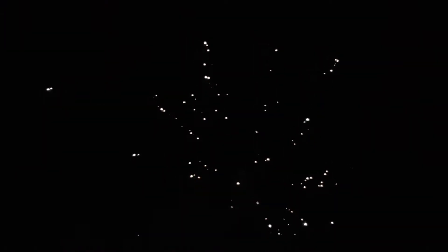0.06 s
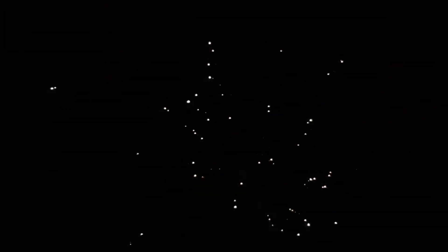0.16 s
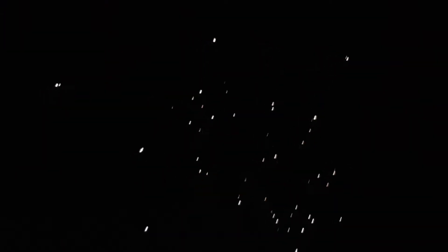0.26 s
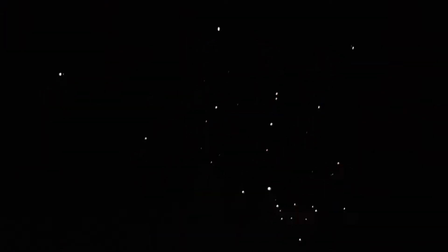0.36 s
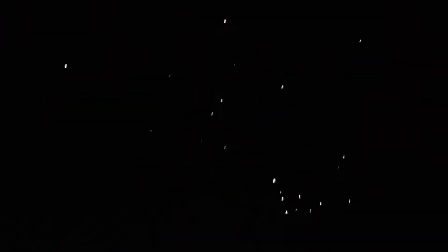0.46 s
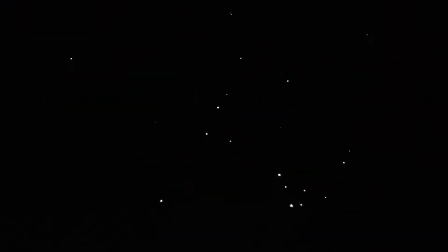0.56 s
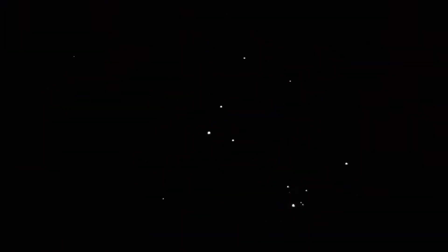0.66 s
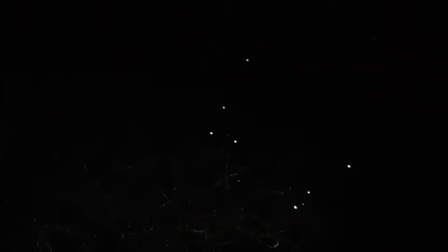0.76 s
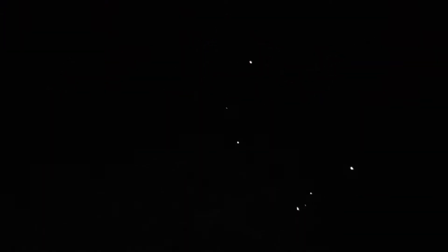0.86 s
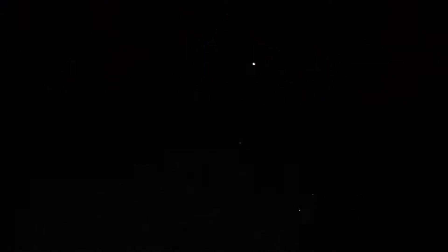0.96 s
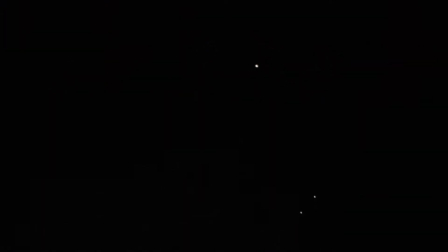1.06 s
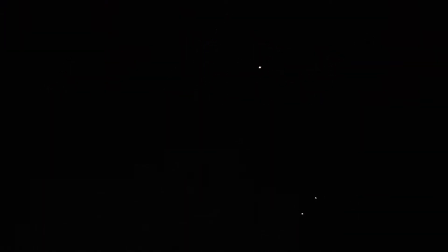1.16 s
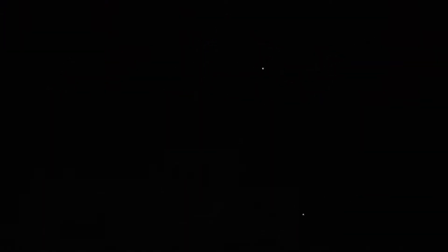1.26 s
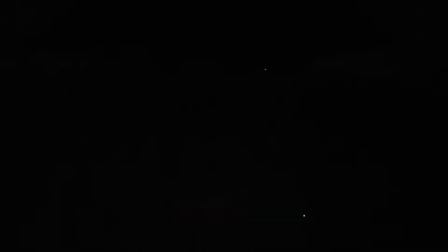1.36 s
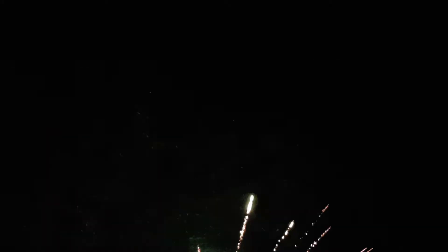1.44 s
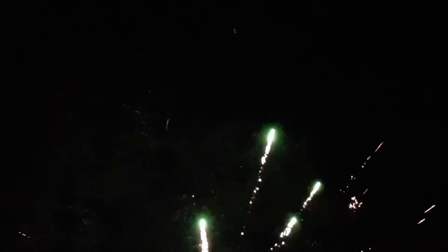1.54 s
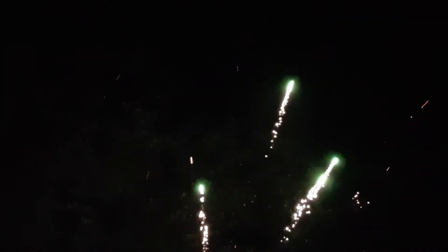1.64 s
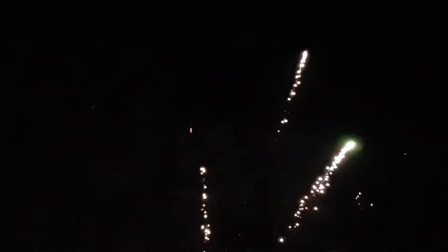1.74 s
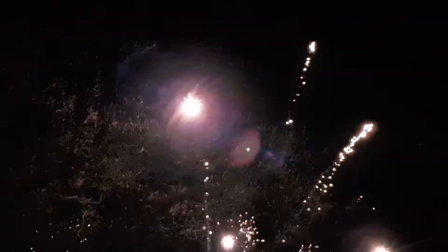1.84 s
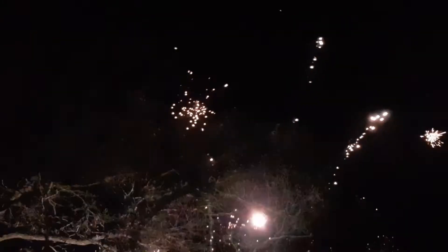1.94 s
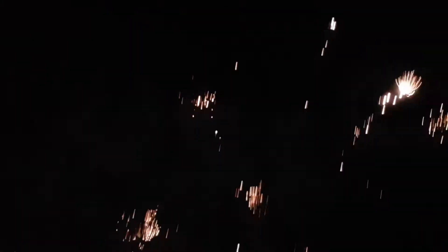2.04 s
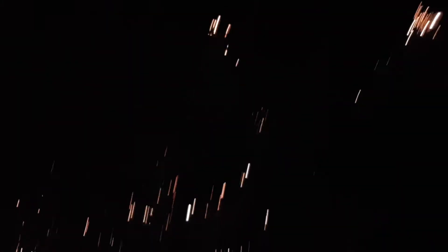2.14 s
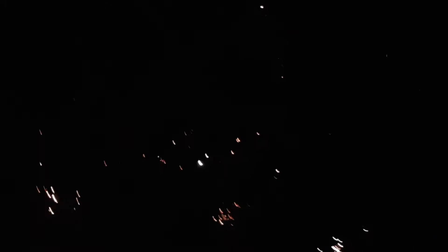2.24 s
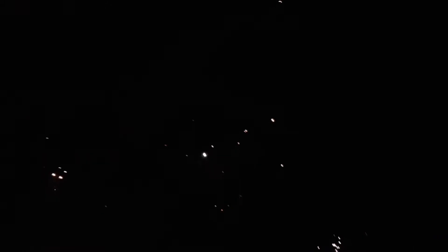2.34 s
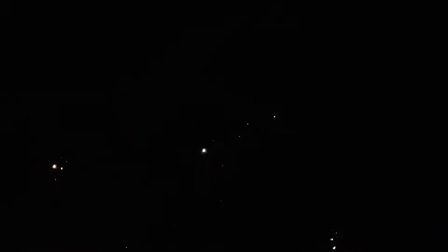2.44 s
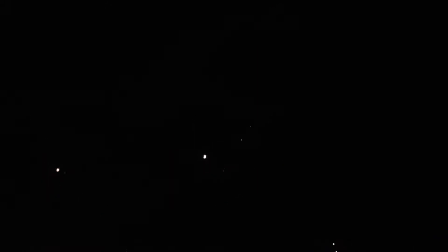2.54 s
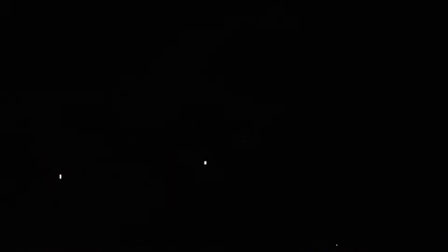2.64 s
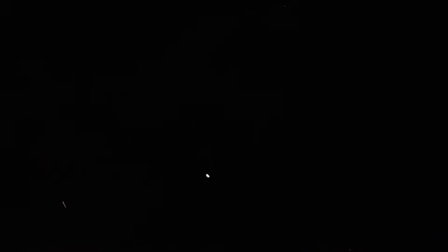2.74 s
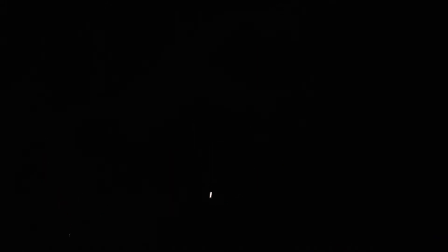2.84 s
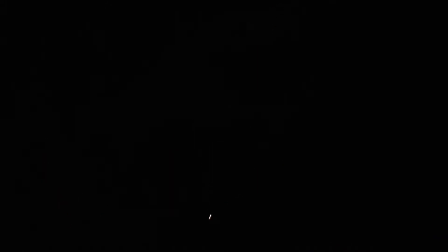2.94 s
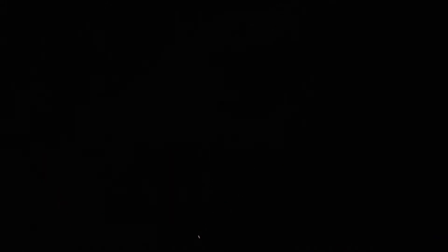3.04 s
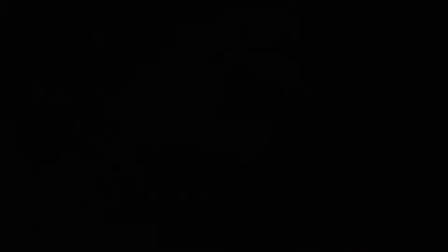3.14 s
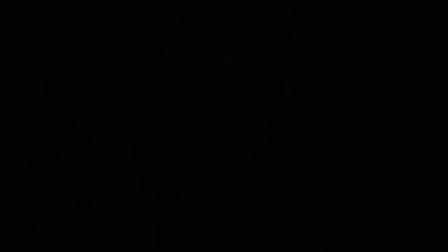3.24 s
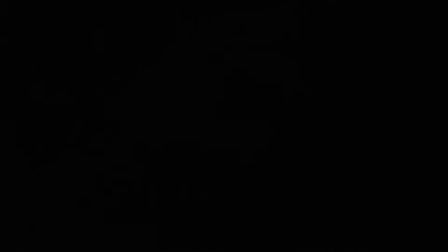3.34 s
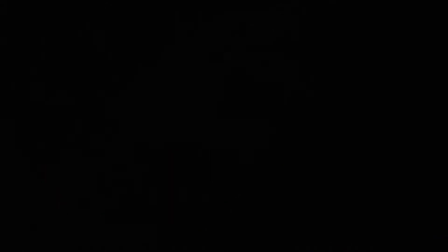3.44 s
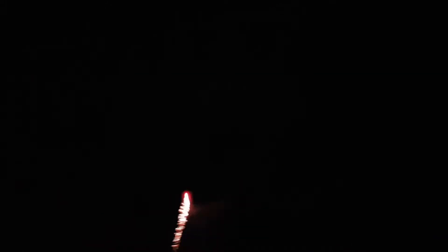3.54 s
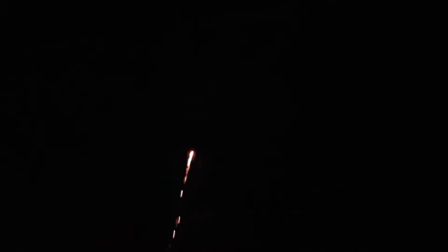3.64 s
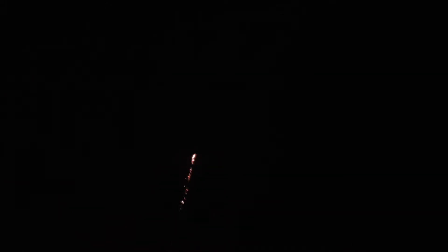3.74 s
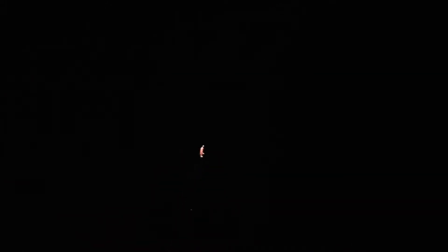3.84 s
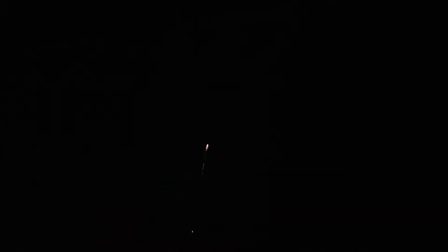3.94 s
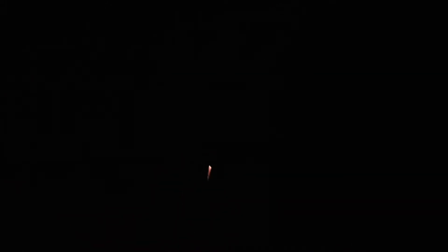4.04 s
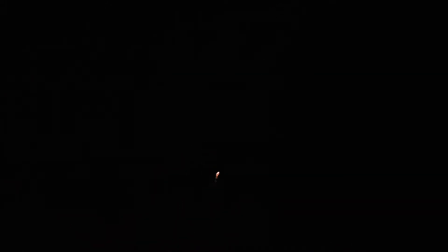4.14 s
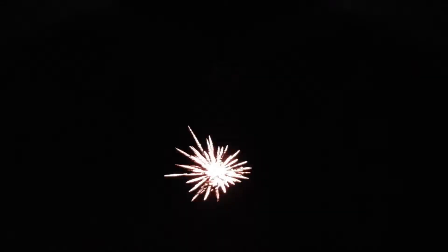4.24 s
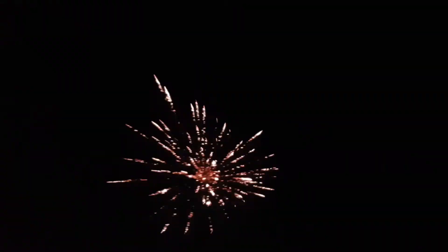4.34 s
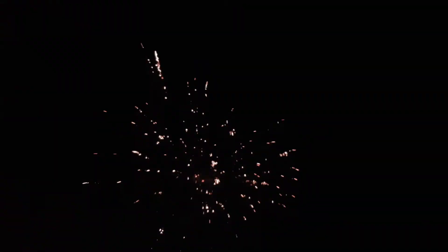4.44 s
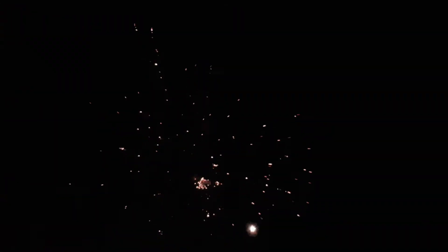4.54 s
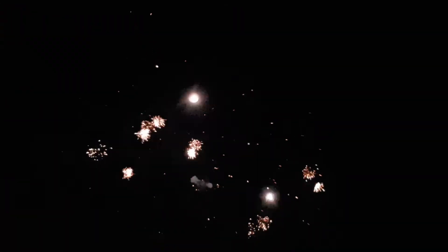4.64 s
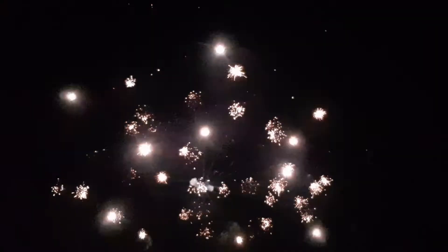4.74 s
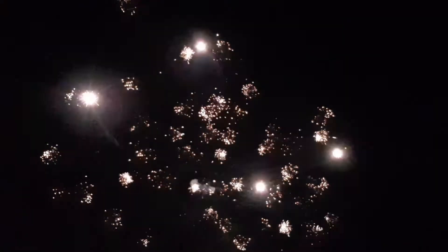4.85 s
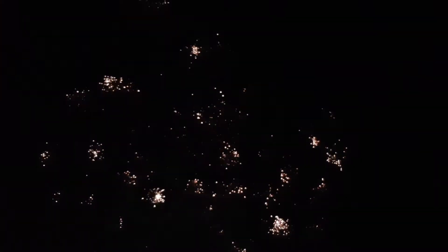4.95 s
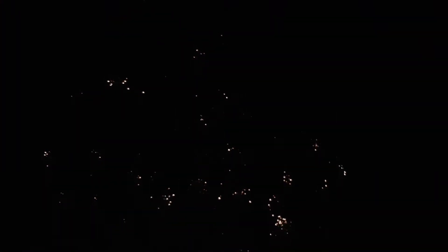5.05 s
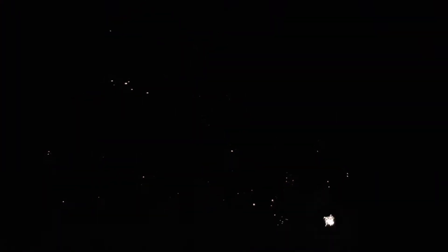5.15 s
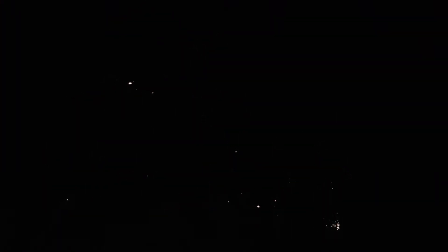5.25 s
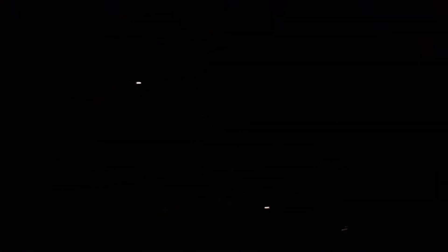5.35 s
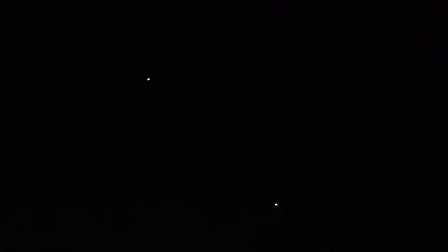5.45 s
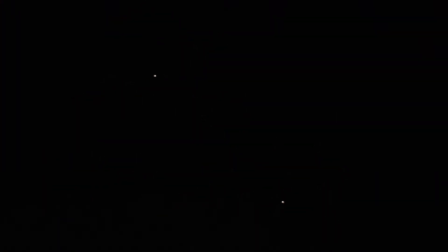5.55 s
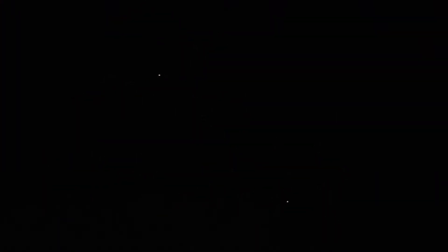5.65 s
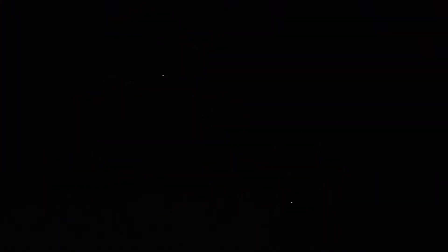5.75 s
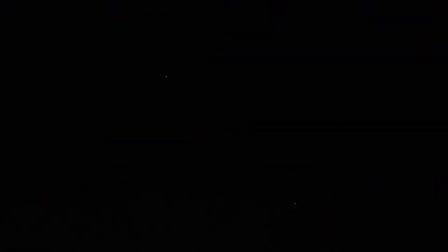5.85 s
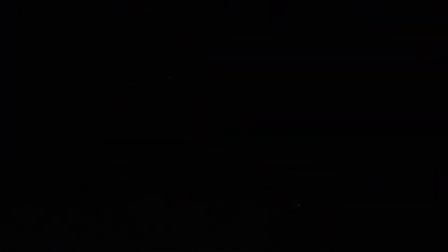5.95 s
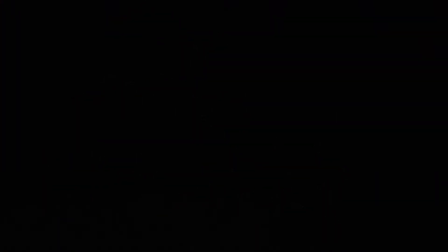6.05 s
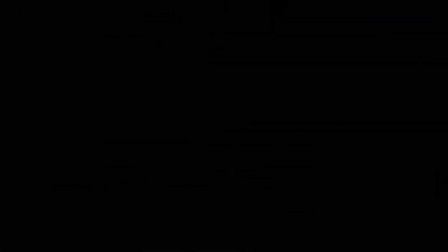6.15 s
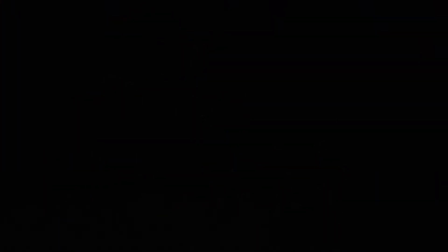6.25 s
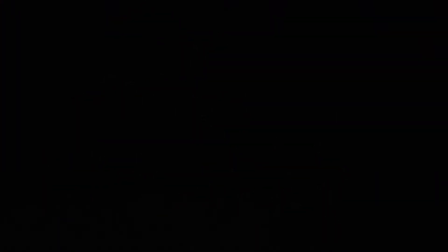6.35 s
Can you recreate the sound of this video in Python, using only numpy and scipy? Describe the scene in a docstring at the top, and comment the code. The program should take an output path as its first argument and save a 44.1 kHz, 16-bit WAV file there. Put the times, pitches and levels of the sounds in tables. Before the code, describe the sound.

A firework battery fires nearby in the open at night. A tube whumps, the shell fizzes upward and bursts with a loud bang that echoes off houses and rolls away, followed by a quick cloud of crackles. After a lull the sequence repeats with a drier bang, and a third launch comes at the very end. A faint distant roar lies underneath, and both bursts overload the stereo microphone.

```python
"""Fireworks at night

A firework battery fires nearby: mortar tubes whump, shells fizz upward and burst, their stars crackle.
Each burst arrives directly and off the ground, then houses throw it back and it rolls away over open
country. A distant roar lies underneath; the two bursts overload the microphone."""
import sys
import numpy as np
from scipy import signal
from scipy.fft import rfft, irfft, next_fast_len
from scipy.io import wavfile
from scipy.ndimage import map_coordinates

SR = 44100
rng = np.random.default_rng(int(sys.argv[2]) if len(sys.argv) > 2 else 0)


def to_wav(s):
    """Save 16-bit WAV."""
    ch = np.atleast_2d(s).T  # columns
    pcm = np.round(np.clip(ch, -1, 1) * 32767)  # PCM
    wavfile.write(sys.argv[1], SR, pcm.astype(np.int16))


N = 282240


def amp(db):
    """Turn decibels into a gain."""
    return 10 ** (np.asarray(db) / 20)


def unit(x):
    """Scale a signal to an average (rms) level of 1."""
    return x / np.sqrt(np.mean(x ** 2) + 1e-20)


def along(points, hz):
    """Read between a table's (frequency, value) points, on a log frequency axis."""
    freqs, values = np.transpose(points)
    return np.interp(np.log(hz + 1), np.log(freqs), values)


def tilted(colour, slope_db):
    """Brighten a spectrum by slope_db per octave, pivoting at 600 Hz."""
    return [(hz, db + slope_db * np.log2(hz / 600)) for hz, db in colour]


def lowpass(x, hz):
    """Gently dull the sound above hz."""
    return signal.lfilter(*signal.butter(1, hz, fs=SR), x)


def wobble(rate, size=N):
    """A smooth random curve through `rate` points a second."""
    return map_coordinates(rng.standard_normal(int(size * rate / SR) + 4), [np.arange(size) * rate / SR])


def swell(start, rise_s, fade_db_per_s):
    """A loudness curve that rises from `start` and fades steadily."""
    t = np.maximum(np.arange(N) / SR - start, 0)
    return (1 - np.exp(-(t / rise_s) ** 2)) * amp(-fade_db_per_s * t)


def add(out, start, x):
    """Mix x into out, beginning at `start` seconds."""
    i = max(round(start * SR), 0)
    out[..., i:i + x.shape[-1]] += x[..., :max(N - i, 0)]


# how alike the two microphones sound: (frequency [Hz], likeness [1 = the same])
LIKENESS = [(60, 0.9), (200, 1), (550, .5), (1100, 0), (1700, -0.11), (4000, 0)]
# which side noise and echoes lean to: (frequency [Hz], left minus right [dB])
ECHO_BALANCE = [(100, 1.5), (300, 1.5), (550, 2.5), (1000, 4.5), (2000, -3), (4000, -0.5), (14000, -1.5)]
def diffuse(colour, size=N, balance=ECHO_BALANCE):
    """Stereo noise from all sides: alike in the bass, unrelated in the treble."""
    hz = np.fft.rfftfreq(size, 1 / SR)
    width = np.arccos(np.clip(along(LIKENESS, hz), -1, 1)) / 2
    spectra = rfft(rng.standard_normal((2, size))) * amp(along(colour, hz))
    mid, side = spectra * [np.cos(width), np.sin(width)]
    lean = amp(along(balance, hz) / 2)
    return unit(irfft([(mid + side) * lean, (mid - side) / lean], size))


def echo(colour, decay, rise_s, lumps_db):
    """Two seconds of scattered reflections; each frequency dies away at its own rate."""
    size = 2 * SR
    hz, frame_s, spectra = signal.stft(diffuse(colour, size), SR, nperseg=256)
    fade = amp(-60 * frame_s / along(decay, hz)[:, None])
    tail = signal.istft(spectra * fade, SR, nperseg=256)[1][:, :size]
    t = np.arange(size) / SR
    return tail * (1 - np.exp(-(t / rise_s) ** 2)) * amp(lumps_db * wobble(70, size))


def shock(length_s):
    """A sudden push followed by a pull: the pressure wave of a small charge."""
    age = np.arange(SR // 20) / SR / length_s
    wave = np.sin(np.pi * age) * np.exp(-(age / 2) ** 4) * np.exp(-age / 6)
    return signal.lfilter(*signal.butter(1, min(0.023 / length_s, 2000), 'highpass', fs=SR), wave)


def snap(life_s, top_hz):
    """A brief splinter of noise, different at each microphone."""
    t = np.arange(SR // 20) / SR
    noise = lowpass(rng.standard_normal((2, len(t))), top_hz)
    return unit(noise) * np.exp(-t / life_s)


# dips in the background: (time of the lowest point [s], depth [dB])
ROAR_DIPS = [(2.35, 18), (4.22, 21.5)]
def roar_level(sink_db_per_s=13, recover_db_per_s=8.5):
    """The background swells up at the start, then twice sinks and creeps back."""
    t = np.arange(N) / SR
    dips = [depth_db - np.maximum(sink_db_per_s * (lowest - t), recover_db_per_s * (t - lowest))
            for lowest, depth_db in ROAR_DIPS]
    opening_db = 8.5 * np.exp(-t / 0.2)
    return amp(-np.maximum(np.max(dips, axis=0), 0) - opening_db)


# tone of the roar and of the far crackle: (frequency [Hz], level [dB])
ROAR_COLOUR = [(15, -49.5), (25, -28), (97, -8.5), (180, -7.5), (242, -4), (503, -2), (677, -5.5),
               (988, -15), (1190, -15.5), (1650, -18.5), (2760, -24.5), (6210, -53.5), (7310, -59),
               (12200, -44), (16000, -51)]
WASH_COLOUR = [(400, -22), (1200, -1.5), (2600, -3), (3600, -12.5), (5500, -24), (8000, -39)]
# which side the far rumble leans to: (frequency [Hz], left minus right [dB])
ROAR_BALANCE = [(60, -1), (550, 4), (1650, 1), (5000, -14), (15000, -12)]
# waves of far crackle: (time [s], level [dB])
WASHES = [(-.05, -44), (2.3, -41), (5.2, -39)]
def roar():
    """A distant roar, and above it crackle that distance has blurred to a wash."""
    low = amp(-40 + 0.46 * wobble(25)) * diffuse(ROAR_COLOUR, balance=ROAR_BALANCE)
    waves = sum(amp(db) * swell(start, rise_s=0.24, fade_db_per_s=18) for start, db in WASHES)
    wash = waves * amp(0.72 * wobble(28)) * diffuse(WASH_COLOUR)
    return roar_level() * (low + wash)


# dull, distant shots: (time [s], level [dB])
FAR_SHOTS = [(.42, -46), (3.25, -50)]
# their tone: (frequency [Hz], level [dB])
FAR_COLOUR = [(40, -12.5), (100, -0.5), (420, -1), (900, -12.5), (2500, -32.5), (6000, -60.5)]
def far_shots():
    """Other fireworks, far away, swell into the roar as a soft rumble."""
    rolls = sum(amp(db) * swell(start, rise_s=0.01, fade_db_per_s=27.5) for start, db in FAR_SHOTS)
    return rolls * diffuse(FAR_COLOUR, balance=ROAR_BALANCE)


# climbing shells: (time [s], burn length [s], level [dB])
COMETS = [(.63, .76, -49), (3.4, .92, -67)]
# flare-ups of their tails: (time [s], level [dB])
FLARES = [(.83, -48.5), (3.61, -71), (3.75, -70.5)]
# tone of the fizz: (frequency [Hz], level [dB])
FIZZ_COLOUR = [(300, -15), (2000, -7), (4500, -2.5), (7500, -10), (11500, -7), (15000, -9.5)]
def comets():
    """The burning tail of a shell fizzes and spits as it climbs away, and now and then flares up."""
    t = np.arange(N) / SR
    burn = sum(amp(db) * swell(start, rise_s=0.02, fade_db_per_s=12.5) * (t < start + burn_s)
               for start, burn_s, db in COMETS)
    flare = sum(amp(db) * np.exp(-((t - peak) / 0.031) ** 2) for peak, db in FLARES)
    spits = unit(amp(2 * wobble(1000)) * diffuse(FIZZ_COLOUR))
    bright_fizz = diffuse(tilted(FIZZ_COLOUR, slope_db=10))
    return amp(1.3 * wobble(25)) * (burn * spits + flare * bright_fizz)


# soft thuds: (time [s], level [dB])
THUDS = [(.596, -26), (3.373, -23.5), (6.323, -29.5)]
# their tone: (frequency [Hz], level [dB])
THUD_COLOUR = [(40, -8), (150, -4), (420, 0), (900, -12), (3000, -12), (7000, -43)]
def thuds():
    """A short dull knock comes a moment before each tube fires."""
    out, t = np.zeros((2, N)), np.arange(SR // 20) / SR
    knock = np.exp(-((t - 0.005) / 0.0031) ** 2)
    for start, db in THUDS:
        add(out, start - 0.002, amp(db) * knock * diffuse(THUD_COLOUR, len(t)))
    return out


# mortar shots: (time [s], crack [dB], whump [dB], whump pitch [Hz], echo [dB],
#   hiss [dB], hiss length [s], hiss growth [dB], returning whump [dB])
LAUNCHES = [(0.6242, -5, 0.5, 214, -31, -14.5, 0.049, 34.5, -25),
            (3.3843, -4.5, -2.5, 146, -22.5, -46, 0.027, 7, -21),
            (6.336, -1.5, -9, 138, -25.5, -33.5, 0.014, 14, -32)]
# tone of their hiss and of their echoes: (frequency [Hz], level [dB])
HISS_COLOUR = [(100, -5), (400, -7.5), (1000, -11), (2500, -4), (4500, -4.5), (6000, -14), (9000, -13),
               (11000, -40), (15000, -21)]
LAUNCH_COLOUR = [(25, -25), (90, -6.5), (170, 1), (320, -4.5), (600, -10.5), (1050, 0), (1700, -3.5),
                 (2400, -5.5), (4200, -7.5), (7000, -13.5), (15000, -21)]
# how long they echo: (frequency [Hz], time to fade by 60 dB [s])
LAUNCH_DECAY = [(60, 0.2), (250, 0.58), (1200, 0.56), (3000, 0.71), (7000, 0.49), (14000, .42)]
# house fronts that answer each shot: (delay [s], level [dB])
HOUSE_FRONTS = [(.008, 6.5), (.019, 1), (0.049, -1), (.072, -3.5)]
def launches():
    """A hiss swells into the muzzle crack, the tube gives one low whump and the houses answer."""
    out, t = np.zeros((2, N)), np.arange(SR // 20) / SR
    knock = np.exp(-t / 0.0088) * (1 - np.exp(-t / 0.002))
    for start, crack_db, whump_db, hz, echo_db, hiss_db, hiss_s, growth_db, return_db in LAUNCHES:
        hiss = diffuse(HISS_COLOUR, SR // 10)
        countdown = np.arange(SR // 10)[::-1] / SR / hiss_s
        add(out, start - 0.1, hiss * amp(hiss_db - growth_db * countdown) / (1 + countdown ** 10))
        crack = shock(length_s=0.00014) + amp(-8) * snap(life_s=0.0015, top_hz=3500)
        add(out, start, amp(crack_db) * crack * amp([[-1.5], [1.5]]))  # a little to the right
        ring = np.sin(2 * np.pi * hz * t) * np.exp(-t * hz / 0.44)
        whump = signal.lfilter(*signal.butter(2, hz * 0.67, 'highpass', fs=SR), ring)
        add(out, start + 0.0012, -amp(whump_db) * whump)
        tail = echo(LAUNCH_COLOUR, LAUNCH_DECAY, rise_s=0.005, lumps_db=-0.5)
        add(out, start, amp(echo_db - 1) * tail)
        for delay_s, db in HOUSE_FRONTS:
            add(out, start + delay_s, amp(echo_db + db + 3) * knock * diffuse(LAUNCH_COLOUR, len(t)))
            add(out, start + delay_s, amp(return_db) * whump)
    return out


def star(length_s, spread_s=0.00016):
    """One tiny shock with a papery edge; its place in the sky sets which microphone hears it first."""
    length_s *= np.exp(rng.standard_normal() / 6)
    pop = shock(length_s) + amp(-7) * shock(length_s * 1.91)
    edge = signal.lfilter([1, -1], [1, -0.93], snap(life_s=0.0007, top_hz=10000))
    pair = pop + amp(-8) * edge
    left, right = pair / np.abs(signal.hilbert(pair)).max() * amp([[-2], [0]])
    lag = int(np.clip(rng.normal(0, spread_s) * SR, -20, 20))
    return np.array([np.roll(left, max(lag, 0)), np.roll(right, max(-lag, 0))])


def cloud(start, end, peak_db, count=150, loudest_at=0.58):
    """A cloud of small popping stars that grows louder, then fades."""
    out = np.zeros((2, N))
    for k, (jitter, size) in enumerate(rng.random((count, 2))):
        progress = (k + 3 * jitter) / (count + 2)
        db = peak_db - 9.5 * (2 * (progress - loudest_at)) ** 2 + 10 * (size ** 3 - 1)
        add(out, start + progress * (end - start), amp(db) * star(length_s=0.0001, spread_s=0.00015))
    return out


# tone of the stars' echoes: (frequency [Hz], level [dB])
CRACKLE_COLOUR = [(40, -30), (200, -9), (600, -7), (1300, -3.5), (2300, 0), (4200, 2), (7000, -1),
                  (15000, 6)]
def scatter(x, decay, rise_s):
    """The crackle as the surroundings throw it back."""
    tail = echo(CRACKLE_COLOUR, decay, rise_s, lumps_db=0.8)
    return signal.fftconvolve(x, tail / np.linalg.norm(tail[0]), axes=1)[:, :N]


# each shell's cloud of stars: (start [s], end [s], level [dB], dulled above [Hz])
CLOUDS = [(1.829, 2.092, -12, 20200), (4.679, 5.045, -9, 9700)]
# the loudest single stars: (time [s], level before the lift [dB], ground bounce [dB])
POPS = [(1.7938, -12, -1.5), (1.8277, -8.5, 0), (1.8514, -7, -6.5), (1.8862, -11.5, -3), (1.913, -12, -14),
        (1.935, -8.5, -2.5), (1.974, -11, 2.5), (1.9775, -12, -8), (1.999, -9.5, 1), (2.0274, -14.5, 1.5),
        (2.0705, -12, -0.5), (2.1137, -20.5, -4), (2.1888, -24, -4), (2.2283, -22, -16),
        (4.7038, -20.5, -12), (4.7389, -16, -1), (4.807, -18.5, 2), (4.8276, -17, 3), (4.8427, -14.5, 1),
        (4.8835, -11, -3), (4.9474, -12.5, -2), (4.9937, -19, 0), (5.0254, -16.5, -10), (5.2906, -19.5, -2)]
# quick scatter off the gardens, and the lingering echo: (frequency [Hz], time to fade by 60 dB [s])
GARDEN_DECAY = [(200, 0.14), (2500, 0.058), (14000, 0.07)]
LINGER_DECAY = [(200, 0.33), (2500, 0.86), (5000, 0.69), (8000, 0.58), (14000, 0.26)]
def crackle(lift_db=7.5, ground_lag_s=0.008):
    """Stars pop singly and in clouds; a brief scatter follows each, and a faint hissing echo lingers."""
    shells = [cloud(start, end, db) for start, end, db, _ in CLOUDS]
    for start, db, ground_db in POPS:
        shell = shells[np.argmin([abs(start - row[0]) for row in CLOUDS])]
        add(shell, start, amp(db + lift_db) * star(length_s=0.0001))
        add(shell, start + ground_lag_s, amp(db + lift_db + ground_db) * star(length_s=0.00013))
    # the air dulls the stars of the farther shell
    stars = sum(lowpass(shell, hz) for shell, (*_, hz) in zip(shells, CLOUDS))
    gardens = amp(-4.5) * scatter(stars, GARDEN_DECAY, rise_s=0.0016)
    lingering = amp(-10) * scatter(stars, LINGER_DECAY, rise_s=0.022)
    return stars + gardens + lingering


def blast(length_s):
    """A jump in pressure, its fall, and the longer suction behind it."""
    age = np.arange(SR // 20) / SR / length_s
    return (1 - age) * np.exp(-age)


# tone of a burst's echo off the houses: (frequency [Hz], level [dB])
HOUSE_COLOUR = [(25, -41.5), (80, -27), (160, -13.5), (300, -3.5), (620, 0), (900, -4.5), (1350, -10.5),
                (2100, -7.5), (3800, -12), (6000, -20), (15000, -31)]
def house_echoes(bright_db, air_hz=7500, air_loss_db_per_s=69.5):
    """One second of dense reflections; the air takes away their highest treble."""
    t = np.arange(SR) / SR
    noise = diffuse(tilted(HOUSE_COLOUR, bright_db), SR) * amp(0.53 * wobble(330, SR))
    dull = signal.sosfiltfilt(signal.butter(2, air_hz, fs=SR, output='sos'), noise)
    return dull + (noise - dull) * amp(6.5 - air_loss_db_per_s * t)


# bursting shells: (time [s], level [dB], blast length [s], ground delay [s], ground bounce [dB],
#   house echo [dB], its rise [s], its hold [s], its time to fade by 60 dB [s], far roll [dB],
#   echo brightness [dB per octave], big wall delay [s], its spread [s], its lift [dB])
BURSTS = [(1.387, 3.5, .0015, .0063, -7, -12, 0.0085, 0.081, 0.59, -19, 0.1, .065, .03, 1),
          (4.3166, -2, 0.0023, .0098, 4, -24, 0.002, 0.033, 0.12, -21.5, -0.47, 0.0305, 0.0069, 3)]
# tone of the far roll: (frequency [Hz], level [dB])
ROLL_COLOUR = [(25, -38), (100, -18.5), (300, -7.5), (600, -1.5), (850, -5.5), (1300, -10.5), (2200, -10),
               (4000, -11.5), (7000, -17.5), (15000, -25)]
# how long it rolls: (frequency [Hz], time to fade by 60 dB [s])
ROLL_DECAY = [(60, 1.9), (250, 1.9), (600, 1.765), (2500, 1.61), (5000, 0.93), (8000, 0.67), (14000, 0.72)]
def bursts():
    """A blast wave and its bounce off the ground, dense echoes from the houses, then the far roll."""
    out, t = np.zeros((2, N)), np.arange(SR) / SR
    for (start, db, length_s, lag_s, ground_db, house_db, rise_s, hold_s, fade_s,
         roll_db, bright_db, wall_s, spread_s, wall_db) in BURSTS:
        front = amp(-3.5) * shock(length_s=0.00026) + amp(-12) * snap(life_s=0.0025, top_hz=9000)
        add(out, start, amp(db) * front)
        # the overdriven right microphone swings back more slowly than the left
        swing = -np.array([blast(length_s * 1.1), blast(length_s * 3.1)])
        add(out, start + 0.0005, amp(db) * swing)
        # soft ground rounds off the reflected wave
        bounce = shock(length_s=0.00097) + amp(-12) * snap(life_s=0.0049, top_hz=1500)
        add(out, start + lag_s, amp(db + ground_db) * bounce)
        add(out, start + lag_s + 0.00078, amp(db + ground_db - 13) * swing)
        # the biggest wall lifts the echoes once more and returns a dull boom
        envelope = (1 - np.exp(-t / rise_s)) * amp(-60 * np.maximum(t - hold_s, 0) / fade_s)
        big_wall = amp(wall_db * np.exp(-((t - wall_s) / spread_s) ** 2))
        add(out, start + lag_s, amp(house_db) * envelope * big_wall * house_echoes(bright_db))
        add(out, start + lag_s + wall_s, amp(db + ground_db - 11.5) * shock(length_s=0.0014))
        roll = echo(tilted(ROLL_COLOUR, bright_db), ROLL_DECAY, rise_s=0.011, lumps_db=1)
        add(out, start, amp(roll_db) * roll)
    return out


def scene():
    """All sources at the two microphones."""
    return roar() + comets() + thuds() + launches() + bursts() + crackle() + far_shots()


def record(dry, bass_hz=30, top_hz=16100):
    """The microphone loses the deepest bass, flattens the blasts and cuts the highest treble."""
    x = signal.lfilter(*signal.butter(1, bass_hz, 'highpass', fs=SR), dry)
    flattened = x / (1 + np.abs(x) ** 8) ** (1 / 8)
    size = next_fast_len(N + SR // 2)
    treble_cut = 1 / (1 + (np.fft.rfftfreq(size, 1 / SR) / top_hz) ** 90)
    return irfft(rfft(flattened, size) * treble_cut, size)[:, :N]


dry = scene()
out = record(dry)
to_wav(out)
```